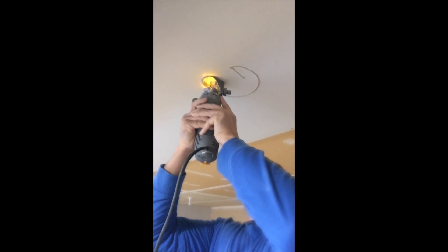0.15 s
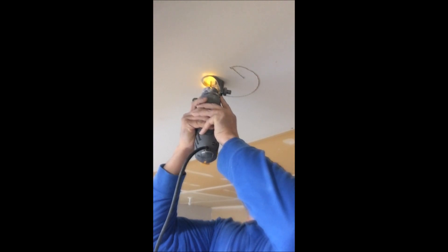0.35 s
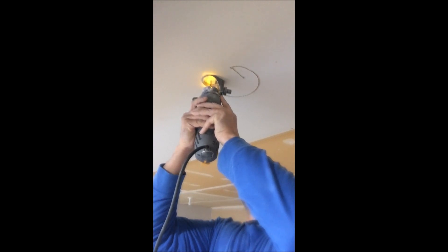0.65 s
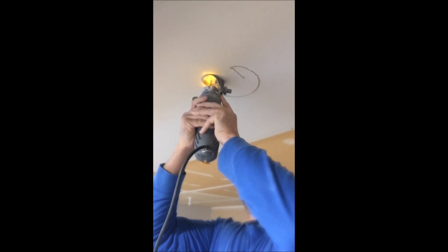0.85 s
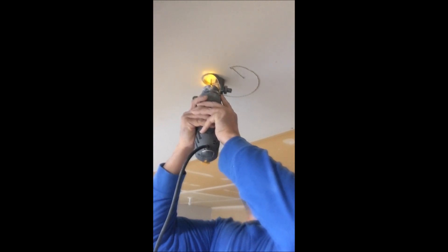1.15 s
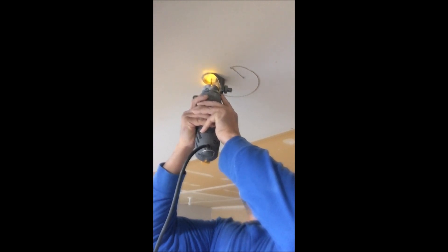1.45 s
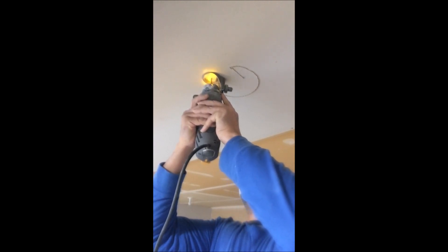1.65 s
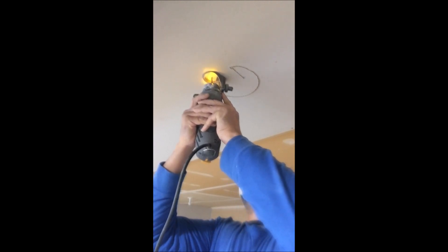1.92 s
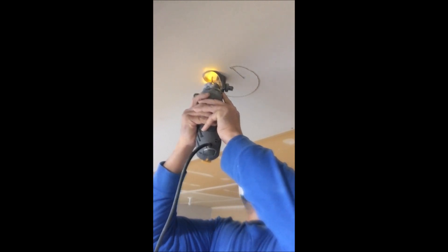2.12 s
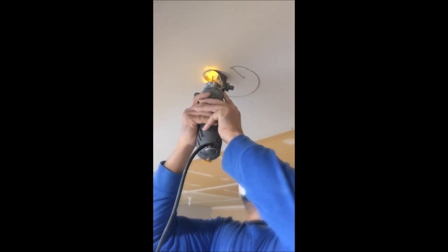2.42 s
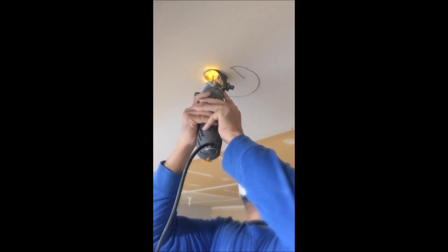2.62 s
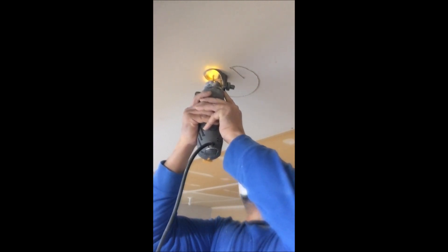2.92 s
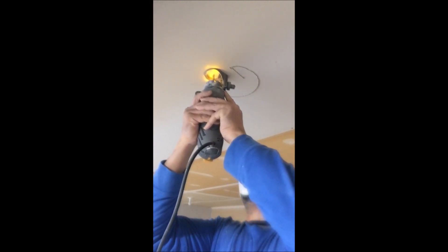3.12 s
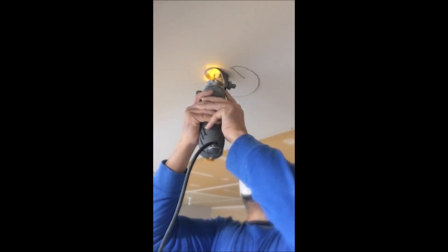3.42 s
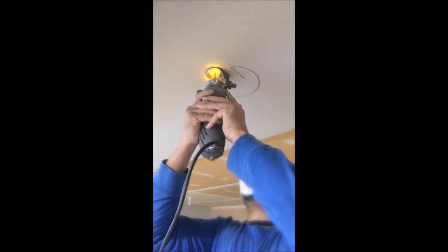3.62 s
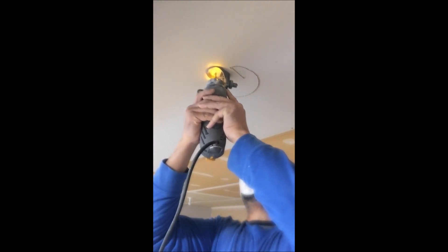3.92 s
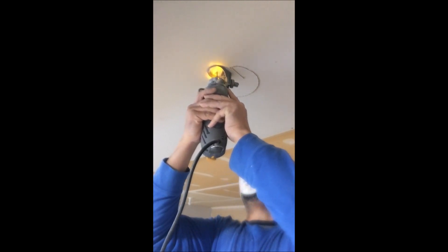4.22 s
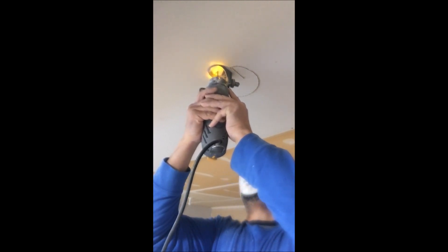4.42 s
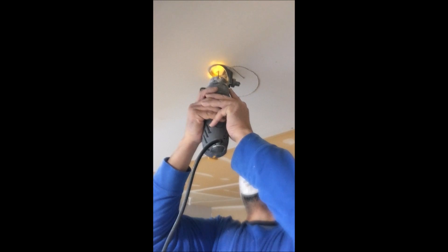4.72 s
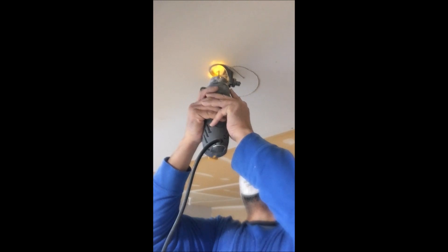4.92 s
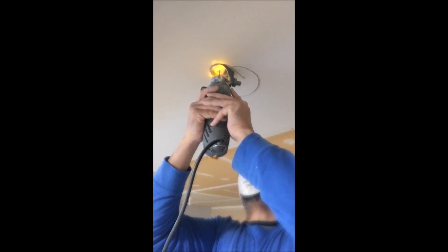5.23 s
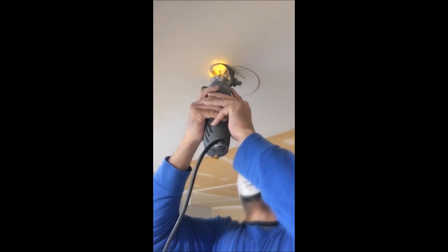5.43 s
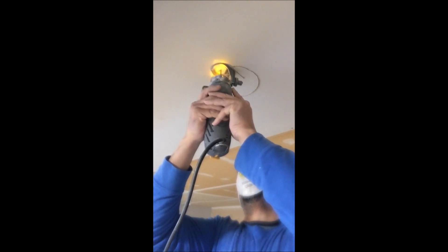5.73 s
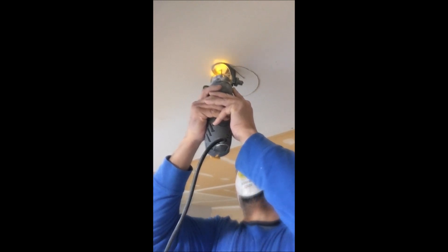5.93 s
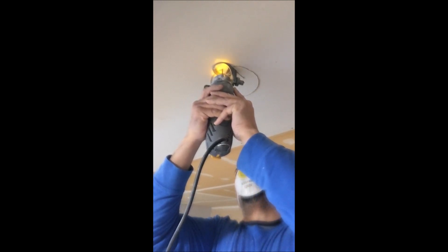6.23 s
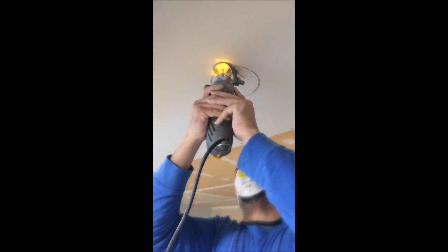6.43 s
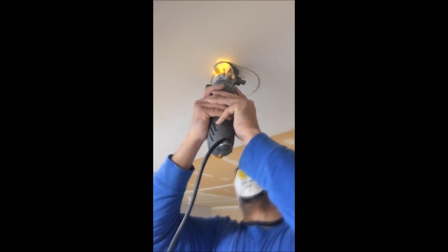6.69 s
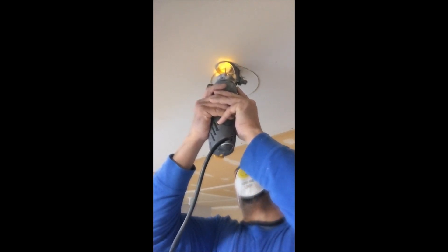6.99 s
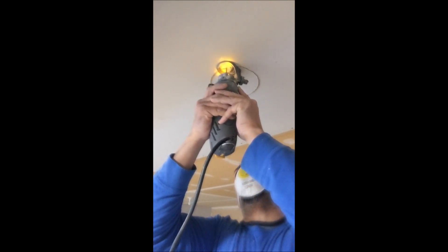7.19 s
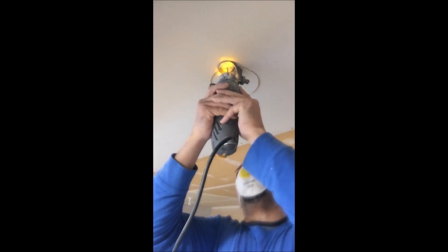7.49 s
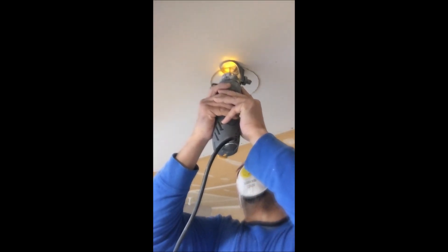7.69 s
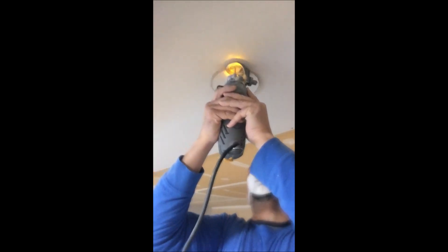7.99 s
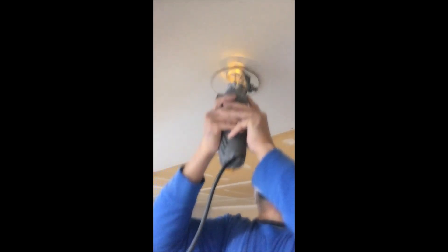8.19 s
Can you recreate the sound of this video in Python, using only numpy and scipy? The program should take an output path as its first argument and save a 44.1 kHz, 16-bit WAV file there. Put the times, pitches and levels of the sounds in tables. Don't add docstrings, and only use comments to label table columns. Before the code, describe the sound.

Already running at the start, a rotary tool cuts a plasterboard ceiling: dense motor drone, wavering mid-pitched singing tones, dry rasp and bright hiss. A harsher grinding bite comes early, followed by lighter, fluttering cutting with a quick cluster of knocks midway. The low hum weakens later and the tool spins up slightly on leaving the board. Close, dry phone pickup in a garage, treble slightly watery with small dropouts.

```python
import sys
import numpy as np
from scipy import signal
from scipy.fft import rfft, irfft, next_fast_len
from scipy.io import wavfile
from scipy.ndimage import uniform_filter1d, minimum_filter1d, map_coordinates

SR = 44100
rng = np.random.default_rng(int(sys.argv[2]) if len(sys.argv) > 2 else 0)


def voltage_ratio(level):
    return 10 ** (np.asarray(level, float) / 20)


def int16_out(signal):
    q = np.round(np.clip(np.atleast_2d(signal).T, -1, 1) * 32767)
    wavfile.write(sys.argv[1], SR, q.astype(np.int16))


N = 368220
T = np.arange(N) / SR


def read(table):
    s, *columns = np.transpose(table)
    return [np.interp(T, s, c) for c in columns]


def walk(rate):
    knots = rng.standard_normal(int(N / SR * rate) + 4)
    return np.interp(T, T[::32], map_coordinates(knots, [T[::32] * rate + 1], order=2))


def noise(shape, patchy_db, shared_db):
    size = next_fast_len(N)
    hz, db = np.transpose(shape)
    bin_hz = np.arange(size // 2 + 1) * SR / size
    colour = np.interp(np.log(bin_hz + 1), np.log(hz), db, left=-90, right=-90)
    coloured = irfft(rfft(rng.standard_normal(size)) * voltage_ratio(colour), size)
    bins = signal.stft(coloured, nperseg=1024)[2]
    patches = uniform_filter1d(rng.standard_normal(bins.shape), size=2, axis=0)
    patches = uniform_filter1d(patches, size=4, axis=1)
    patchy = bins * voltage_ratio(patchy_db * patches / np.std(patches))
    out = signal.istft(patchy, nperseg=1024)[1][:N] * voltage_ratio(shared_db * walk(12))
    return out / np.std(out)


def line(turns, db, rough, rate=36):
    angle = 2 * np.pi * (turns + rng.random())
    shaken = (1 + rough * walk(rate)) * np.cos(angle) + rough * walk(rate) * np.sin(angle)
    return np.sqrt(2 / (1 + 2 * rough ** 2)) * voltage_ratio(db) * shaken


def spells(rows, rest_db, edge_s, swell=0):
    t, (start, length, db) = T[::64, None], np.transpose(rows)
    inside = np.minimum(t - start, start + length - t)
    held = np.clip(.5 + inside / (edge_s + swell * length), 0, 1)
    return np.interp(T, t[:, 0], rest_db + np.max(held * (db - rest_db), axis=1))


def singing(rows, rest_db):
    db = spells(rows, rest_db, edge_s=0.0035, swell=0.22) - 0.03 * walk(9)
    return uniform_filter1d(db, int(0.011 * SR))


def swings(rows, edge_s):
    return sum(db * np.clip(.5 + np.minimum(T - s, s + length - T) / edge_s, 0, 1) for s, length, db in rows)


def staged(biting, steady_db, bite_db, free_db):
    pulled_out = np.clip((T - 7.81) / 0.067, 0, 1)
    return steady_db + bite_db * biting + free_db * pulled_out


BARS = 40
# (time [s], bars passing [Hz])
SPEED = [(0.0, 14975), (0.23, 14956), (0.67, 15078), (1.14, 14940), (1.51, 15056), (2.6, 15157),
         (3.19, 15309), (4.07, 15290), (4.4, 15211), (5.09, 15251), (5.74, 15158), (6.12, 14901),
         (6.98, 14807), (7.81, 14821), (8.09, 15159), (8.35, 15361)]


def bars_passing(at_s):
    return np.interp(at_s, *np.transpose(SPEED))


# (start [s], length [s], grind [dB])
BITE = [
    (1.575, 2.06, -32.5),
    (4.28, 0.16, -44),
    (1.53, .08, -39),
    (2.6, 0.63, -31.5),
    (3.2, 0.425, -31),
    (3.5, 6, -56),
    (7.42, .3, -48),
]


def bite():
    from_s, end_s = 1.56, sum(BITE[0][:2])
    return spells(BITE, -65, 0.018), spells([(from_s, end_s - from_s, 1)], 0, 0.033)


# (frequency [Hz], density [dB per Hz])
HISS = [(4600, -42), (5100, -29), (5600, -31.5), (6300, -17.5), (7300, -2), (8200, -6.5), (9500, -15.5),
        (10500, -25.5), (11800, -25.5), (12600, -38), (13800, -33), (14900, -34), (15700, -34)]


def vent_air(biting):
    pulse = 1 + 0.066 * np.cos(2 * np.pi * 120 * T)
    return voltage_ratio(staged(biting, -40, 1.56, 0.22)) * noise(HISS, 3.07, 0.11) * pulse


# (frequency [Hz], density [dB per Hz])
RUMBLE = [(20, -33), (60, -15.5), (110, -14), (170, -20), (260, -11.5), (400, -1.5), (620, -3), (900, -2),
          (1300, -59)]
# (start [s], length [s], loss [dB])
DRUM_LOSS = [
    (4.3, 0.28, 0),
    (7.7, 0.088, -2),
    (8.07, 0.25, 1.5),
]
# (start [s], length [s], loss [dB])
THUD_LOSS = [
    (3.6, 0.38, -6),
    (4.25, 0.47, -4.5),
    (5.8, 0.62, -2),
    (7.3, .7, 3),
]


def board_drum(biting):
    rumble = voltage_ratio(staged(biting, -45.5, 0.43, -2) + 3.5) * noise(RUMBLE, 2.6, 0.67)
    thud = signal.sosfiltfilt(signal.butter(2, 300, fs=SR, output="sos"), rumble)
    return thud * voltage_ratio(-swings(THUD_LOSS, .1)) + (rumble - thud) * voltage_ratio(-swings(DRUM_LOSS, 0.043))


# (frequency [Hz], density [dB per Hz])
COLLET = [(2500, -17), (2900, -8.5), (3350, -13.5), (3800, 1.5), (3980, -4), (4180, 0.5), (4450, -27)]


def collet_ring():
    return voltage_ratio(-50) * noise(COLLET, 5.5, 1.5)


# (time [s], mains buzz [dB])
LOAD = [(0.0, -47), (0.14, -46), (1.53, -51.5), (1.58, -43.5), (2.84, -49), (2.88, -60), (3.23, -46.5),
        (4.47, -53.5), (7.53, -44.5), (7.77, -49.5), (7.86, -76), (8.05, -58), (8.21, -101), (8.35, -74)]
# (start [s], length [s], loss [dB])
WHINE_LOSS = [
    (1.6, .5, 3),
    (3.55, 1.0, 4),
    (4.7, .7, 2),
    (5.4, .8, -3),
    (7.85, .6, -5),
]
# (start [s], length [s], level [dB])
SIXTH = [(3.588, 0.034, -29.5), (4.167, 0.057, -35), (4.333, 0.032, -37), (4.377, 0.029, -41),
         (4.411, 0.028, -40), (4.455, 0.017, -33), (4.512, 0.036, -26.5), (4.577, 0.048, -30.5),
         (5.15, .06, -39), (5.23, 0.11, -39), (5.65, 0.16, -40), (5.96, 0.1, -38), (6.35, 0.11, -36),
         (6.189, 0.036, -35), (6.233, 0.026, -32), (6.285, 0.029, -40), (6.401, 0.043, -38),
         (6.503, 0.031, -36), (6.571, 0.043, -33), (6.634, 0.031, -36), (6.674, 0.045, -39),
         (6.79, 0.049, -35), (6.984, 0.041, -43), (7.187, 0.031, -36), (7.345, 0.068, -31),
         (7.473, 0.045, -34), (7.664, 0.032, -37), (7.696, 0.043, -33), (7.758, 0.099, -34)]


def motor(turns, shaft_hz, biting):
    above_cruise_hz = shaft_hz - 379
    slewing = uniform_filter1d(abs(np.gradient(shaft_hz)) * SR, size=8000)
    whine_db = -51 - spells(WHINE_LOSS, 0, .1) - 0.2 * slewing
    sixth_db = singing(SIXTH, -46.5)
    high_db = -60 + 3 * walk(0.72)
    whine = line(BARS * turns, whine_db + 1.2 * walk(25), .17)
    fan = line(19 * turns, -48.5 + 1.36 * above_cruise_hz, .6, 60)
    fan = fan + line(21 * turns, high_db, .3) + line(6 * turns, sixth_db, .35)
    mains = 120 * T
    buzz_db = read(LOAD)[0]
    beat_db = staged(biting, -54.5, 5.5, -0.51) + 0.5 * above_cruise_hz
    buzz = line(mains, buzz_db, 0.19) + line(2 * mains, beat_db - 3.5 + 2 * walk(2.18), 0.31)
    upper_db = np.interp(T, [5.5, 6.3], [-15, -3])
    beats = line(turns - mains, beat_db - 2.5, 0.083)
    beats = beats + line(turns + mains, buzz_db + upper_db + 3 * walk(4.9), 0.55)
    return whine + fan + buzz + beats


BALL_PASS = 3.595
# (start [s], length [s], level [dB])
LOW_SIDE = [
    (4.8, 0.23, -51),
    (5.5, 0.092, -53),
    (5.85, .1, -53),
    (7.3, 0.32, -47),
    (7.5, 0.16, -41),
]


def low_sideband(turns):
    return line((BALL_PASS - 2) * turns, spells(LOW_SIDE, -63.5, .04), 0.28)


# (start [s], length [s], level [dB])
FIRST_SIDE = [(0.042, 0.34, -37.5), (0.55, 0.37, -39.5), (1.12, .45, -39), (1.55, .2, -33),
              (1.126, 0.084, -39), (1.533, 2.3, -35), (3.843, 0.38, -38), (6.664, 0.075, -40),
              (7.048, 0.078, -36), (7.382, 0.39, -37), (8.092, 0.23, -43)]
SECOND_SIDE = [(1.08, 0.16, -34.5), (1.25, .1, -27.5), (1.35, .2, -40), (1.738, 0.34, -37),
               (2.097, 0.43, -37), (2.496, 0.071, -43), (2.874, 0.14, -35), (3.095, 0.116, -36),
               (3.271, 0.068, -31), (3.574, 0.14, -41), (6.24, 0.066, -34), (6.57, 0.16, -40),
               (7.19, 0.15, -37), (7.489, 0.026, -30), (7.535, 0.11, -28), (7.63, 0.046, -28),
               (7.44, 0.31, -37), (7.94, 0.079, -36)]


def bearing(turns, biting):
    ball_db = -39.5 + 3.5 * biting + 1.3 * walk(3.3)
    levels = [ball_db, singing(FIRST_SIDE, -46), singing(SECOND_SIDE, -47.5)]
    return sum(line((BALL_PASS + k) * turns, db, r) for k, (db, r) in enumerate(zip(levels, [.08, .14, .26])))


# (frequency [Hz], density [dB per Hz])
GRIND = [(200, -46), (450, -12), (560, 1), (720, -10.5), (950, 5), (1080, 1.5), (1300, -9.5), (2000, -2),
         (3200, -18), (4300, -9.5), (5300, -30), (6600, -17), (9000, -35), (15000, -38)]


def dug_in_grind(turns, grind_db):
    return voltage_ratio(grind_db) * noise(GRIND, .3, .3) * (1 + .1 * np.cos(2 * np.pi * turns))


# (frequency [Hz], density [dB per Hz])
RASP = [(700, -108), (1000, -4.5), (1600, -5.5), (2100, 3.5), (2400, -7), (2700, -10.5), (3000, -9.5),
        (3450, -16), (3900, -11), (4400, -29), (4750, -32.5), (5100, -45)]


def plaster_rasp(turns, biting):
    rasp_db = staged(biting, -32.5, 0.18, 0.22) + 0.5
    return voltage_ratio(rasp_db) * noise(RASP, 2.7, 0.79) * (1 + 0.1 * np.cos(2 * np.pi * turns))


# (start [s], length [s], level [dB])
FOURTEENTH = [
    (3.7, 3.9, -74),
]


def fourteenth_multiple(turns):
    return line(14 * turns, spells(FOURTEENTH, -88, .2), .4)


# (rate [turns
# per shaft turn], level [dB])
FAINT = [(6.595, -51), (7, -48.5), (8, -54.5), (9, -66), (10, -53), (11, -58), (12, -86), (14, -90)]


def faint_lines(turns):
    return sum(line(k * turns, db + 2.5 * walk(5), .55) for k, db in FAINT)


# (time [s], orbit rate [Hz], depth [0-1])
ORBIT = [(3.4, 22.2, 0), (3.7, 21.5, 0.43), (4.1, 21.4, 0), (4.45, 28.7, 0.23), (4.65, 29.3, 0.45),
         (4.85, 27.5, 0.34), (5.05, 26.4, 0.48), (5.4, 29.85, 0.4), (5.75, 36, 0.37), (5.9, 50.4, 0.25),
         (6.1, 55, 0.32), (6.2, 55.3, 0.25)]


def orbit():
    orbit_hz, depth = read(ORBIT)
    uneven = 1 + 0.22 * walk(10)
    circles = np.cumsum(orbit_hz * (1 + 0.191 * walk(16))) / SR
    return np.exp(uneven * depth * np.cos(2 * np.pi * circles)) / (1 + depth ** 2)


# (time [s], jump [dB])
KNOCK = [
    (4.266, 2),
    (4.357, -1),
    (4.387, -1),
]


def knocks():
    at_s, jump_db = np.transpose(KNOCK)
    late = T[:, None][::32] - at_s
    snag = -11 * np.exp(-abs(late) / .012)
    strike = jump_db * np.exp(-abs(late) / .014)
    return np.interp(T, T[::32], np.where(late > 0, strike, snag).sum(axis=1))


# (time [s], once-a-turn tone [dB])
SHAKE = [(0.0, -26), (0.04, -25.5), (2.3, -20.5), (2.49, -25), (3.07, -25.5), (4.37, -42.5), (4.56, -32),
         (6.02, -28.5), (6.14, -36.5), (6.65, -34.5), (6.81, -40), (7.0, -34), (7.46, -31.5), (7.56, -41.5),
         (7.77, -33), (7.81, -48), (8.19, -33.5), (8.35, -46.5)]
# (start [s], length [s], extra [dB])
PLUNGE = [
    (1.56, 0.33, 1.5),
]
# (start [s], length [s], loss [dB])
SLACK = [
    (.93, .05, 2),
    (1.98, .05, 1),
    (4.71, 0.084, 8),
    (4.88, .13, 4.5),
    (5.2, .07, -1.5),
    (6.3, 0.091, 3),
    (7.2, 0.12, 1.5),
]
# (start [s], length [s], level [dB])
SECOND = [(0.014, 0.3, -38.5), (0.367, 0.21, -37.5), (0.928, 0.38, -38), (1.311, 0.18, -42.5),
          (1.467, 0.035, -39), (1.94, 0.12, -43), (2.081, 0.18, -40), (2.42, 0.33, -37),
          (2.746, 0.87, -33.5), (0, 3, -46), (2.3, .6, -38.5), (3.6, 0.2, -41.5), (7.7, 0.73, -45),
          (4.653, 0.63, -37), (5.368, 0.072, -38.5), (5.496, 0.82, -38.5), (6.348, 0.34, -37),
          (6.683, 0.62, -36.5), (7.46, 0.3, -39.5)]
THIRD = [(0.175, 0.028, -32), (0.291, 0.031, -35), (0.327, 0.125, -33), (0.468, 0.43, -31.5),
         (0.953, 0.177, -31), (1.277, 0.043, -32), (1.37, 0.27, -28), (1.712, 0.31, -28),
         (2.021, 0.033, -27), (2.105, 0.1, -28), (2.224, 0.062, -30.5), (2.314, 0.081, -29.5),
         (2.538, 0.28, -24.5), (2.76, 0.1, -29), (2.839, 0.36, -25), (2.89, 0.031, -20.5),
         (3.26, 0.026, -26), (3.298, 0.091, -24.5), (3.45, 0.15, -26.5), (3.702, 0.037, -33),
         (3.805, 0.11, -29.5), (3.923, 0.14, -28), (4.194, 0.03, -27.5), (4.344, 0.14, -25.5),
         (4.49, 0.058, -24), (4.572, 0.049, -27), (4.643, 0.042, -27.5), (4.723, 0.15, -27),
         (4.89, 0.097, -26.5), (4.997, .15, -30.5), (5.146, 0.088, -28.5), (5.27, 0.14, -30),
         (5.4, 0.23, -39), (5.784, 0.041, -37), (5.886, 0.048, -39), (5.936, 0.047, -35),
         (6.357, 0.038, -38), (6.866, 0.041, -39), (7.119, 0.048, -38), (7.175, 0.03, -39),
         (7.239, 0.035, -36), (7.389, 0.2, -34.5), (7.678, 0.029, -38), (7.74, 0.11, -36.5),
         (8.075, 0.058, -34.5), (8.213, 0.071, -39), (0, 5.1, -40), (0, 0.22, -39.5), (1.6, .1, -36),
         (3.38, 0.087, -35), (5.45, 0.17, -34.5), (8.16, 0.11, -38.5), (7.2, .66, -47)]
FOURTH = [(0.027, 0.24, -38), (0.424, 0.108, -39), (0.624, 0.16, -38), (0.923, 0.24, -39),
          (1.202, 0.03, -39), (1.268, 0.144, -33), (1.554, 0.044, -28), (1.628, 0.151, -31),
          (1.783, 0.03, -31), (1.823, 0.065, -29.5), (1.899, 0.033, -35), (1.949, 0.055, -30),
          (2.015, 0.131, -28.5), (2.197, 0.065, -30), (2.342, 0.1, -29), (2.45, 0.13, -30.5),
          (2.582, 0.037, -31), (2.831, 0.057, -29), (2.905, 0.049, -34), (2.987, 0.077, -31),
          (3.228, 0.057, -28), (3.294, 0.075, -30), (3.484, 0.082, -30), (3.579, 0.052, -26),
          (3.647, 0.077, -32), (4.263, 0.028, -21.5), (4.215, .045, -31), (2.67, .1, -39),
          (8.06, .05, -32.5), (4.292, 0.026, -20.5), (4.29, 0.071, -23), (4.363, 0.022, -21),
          (4.386, 0.023, -21.5), (0.24, .06, -38), (0.68, .17, -36), (0.99, .06, -36), (3.82, .12, -34),
          (5.7, .11, -41), (4.41, 0.017, -26), (4.449, 0.04, -23), (4.499, .06, -28), (4.53, 0.03, -23),
          (4.577, 0.029, -28), (4.663, .069, -40), (4.799, 0.075, -41), (4.882, 0.12, -38),
          (5.691, .123, -44), (7.299, 0.095, -31.5), (7.496, 0.031, -33), (7.54, 0.049, -34),
          (7.676, 0.029, -34), (7.786, 0.073, -32.5), (7.882, 0.11, -35), (8.063, 0.037, -33),
          (8.131, 0.036, -37), (8.275, 0.031, -41), (1.5, 2.9, -37.5), (7.3, .56, -41)]
FIFTH = [(1.456, 0.028, -32), (1.546, 0.69, -29), (.07, .1, -38), (.22, .14, -37), (5.05, .1, -37),
         (5.2, .45, -37), (6.6, 0.12, -39.5), (6.9, .08, -40), (7.04, 0.085, -38), (2.36, 0.25, -30),
         (2.5, .17, -29), (2.817, 0.088, -35), (3.262, 0.085, -31.5), (3.384, 0.03, -29),
         (3.44, 0.043, -29), (3.585, 0.04, -27), (4.264, 0.015, -20), (4.3, .025, -26), (4.3, 0.039, -36),
         (4.355, 0.014, -21), (4.385, 0.022, -23), (4.437, .068, -29), (4.537, 0.04, -29),
         (4.628, .05, -33.5), (4.797, 0.11, -34.5), (5.276, 0.049, -34), (5.343, 0.092, -33),
         (5.497, 0.048, -33), (5.535, 0.033, -34), (5.603, 0.051, -35), (6.938, 0.032, -34),
         (7.087, 0.037, -36), (7.297, 0.051, -32), (7.463, 0.15, -35), (7.674, 0.091, -33.5),
         (7.78, .05, -30), (3.7, 0.089, -36), (8.305, 0.041, -40), (.55, 1, -37.5), (1.5, 0.84, -28.5),
         (7.45, .4, -48)]
RESTING_DB = [-48, -44.5, -45, -41, -46.5]
# (start [s], length [s], loss [dB])
FREED = [
    (7.87, 0.12, 11),
    (8.05, 0.048, 9),
    (8.2, .05, 13),
]


def shaft(turns):
    levels = [read(SHAKE)[0] + spells(PLUNGE, 0, 0.033) - spells(SLACK, 0, 0.083)]
    levels += [singing(rows, db) for rows, db in zip([SECOND, THIRD, FOURTH, FIFTH], RESTING_DB)]
    knock_db = knocks()
    gains = [orbit(), voltage_ratio(-swings(FREED, 0.027)), voltage_ratio(0.52 * knock_db), voltage_ratio(knock_db), voltage_ratio(knock_db)]
    rough = [.08, .15, .12, .14, .12]
    return sum(g * line((k + 1) * turns, db, r) for k, (db, g, r) in enumerate(zip(levels, gains, rough)))


def scene():
    shaft_hz = bars_passing(T) / BARS
    turns = np.cumsum(shaft_hz) / SR
    grind_db, biting = bite()
    tool = shaft(turns) + faint_lines(turns)
    tool = tool + bearing(turns, biting) + motor(turns, shaft_hz, biting)
    tool = tool + plaster_rasp(turns, biting) + vent_air(biting)
    tool = tool + dug_in_grind(turns, grind_db) + board_drum(biting)
    tool = tool + collet_ring() + fourteenth_multiple(turns) + low_sideband(turns)
    return tool[None]


def link_floor(hz, frame_s):
    floor_hz = [4300, 4750, 4950, 5150, 5450, 12000, 12500, 13400]
    floor_db = np.interp(hz, floor_hz, [-99, -82, -83, -82, -99, -99, -90.5, -94])
    floor_db = floor_db + 1.6 * walk(12)[np.minimum(frame_s * SR, N - 1).astype(int)]
    lower_db = np.interp(frame_s, [1.5, 4, 7.4, 7.8], [3, -.5, -.5, -3])
    upper_db = np.interp(frame_s, [1.5, 3.7, 5.6, 8], [-2, 1.5, 1, -2])
    return floor_db + np.where(hz < 8000, lower_db, upper_db)


def carried_bins(hz, frame_s):
    whine_hz = bars_passing(frame_s)
    spare = rng.random((len(hz) // 8 + 1, len(frame_s) // 2 + 1)) < .45
    spare = spare.repeat(8, 0).repeat(2, 1)[:len(hz), :len(frame_s)]
    return (hz < whine_hz + 130) | (spare & (whine_hz > 15170))


def strong_bins(hz, size):
    narrow, wide = (-minimum_filter1d(-size, size=width, axis=1) for width in (19, 33))
    top = np.where(hz < 4300, narrow, wide)
    share = np.interp(hz, [300, 800, 2200, 2600, 4400], [.35, .38, .4, .78, .8])
    return (size > share * top) & ((size > voltage_ratio(-65)) | (hz > 14700))


def lost(gaps, db):
    depth = sum(np.clip(6000 * (.6 * length - .0025 - abs(T - s)), 0, db) for s, length in gaps)
    return 1 - uniform_filter1d(voltage_ratio(-depth), size=150)


SHORT_GAPS = [.625, .729, .943, 1.117, 1.498, 1.584, 1.905, 1.947, 2.094, 2.223, 2.628, 2.949, 3.378, 3.526,
              3.782, 4.145, 4.232, 4.572, 5.745, 6.171, 6.535, 6.745, 7.004, 7.474, 7.749, 7.814, 8.18,
              8.218]
# (time [s], length [s])
LONG_GAPS = [
    (2.022, .031),
    (2.897, .033),
    (3.281, .035),
    (5.637, .054),
]
# (time [s], length [s])
BASS_GAPS = [
    (4.145, .028),
    (4.225, .026),
    (7.749, .024),
    (8.172, .034),
    (8.218, .036),
]


def starve(full, thin):
    missing = full - thin
    treble = signal.sosfiltfilt(signal.butter(3, 2100, "high", fs=SR, output="sos"), missing)
    bass = signal.sosfiltfilt(signal.butter(3, 1100, fs=SR, output="sos"), missing)
    sent = full - lost(LONG_GAPS, 55) * missing
    sent = sent - lost([(s, .016) for s in SHORT_GAPS], 20) * treble
    return sent - lost(BASS_GAPS, 30) * bass


def roll_off(x):
    return signal.sosfilt(signal.butter(12, 16240, fs=SR, output="sos"), x)


def record(dry):
    hz, frame_s, bins = signal.stft(dry, SR, nperseg=1024)
    hz = hz[:, None]
    size = uniform_filter1d(abs(bins), size=3, axis=2)
    band = uniform_filter1d(size, size=5, axis=1)
    floor_db = link_floor(hz, frame_s)
    carried = carried_bins(hz, frame_s)
    full = signal.istft(bins * carried * (band > voltage_ratio(floor_db)), nperseg=1024)[1][:, :N]
    keep = strong_bins(hz, size) & carried | (hz < 200)
    lift = np.where((hz > 2500) & (hz < 10000), 1.5, 1)
    thin = signal.istft(bins * keep * lift, nperseg=1024)[1][:, :N]
    return roll_off(starve(full, thin))


dry = scene()
out = record(dry)
int16_out(out)
```